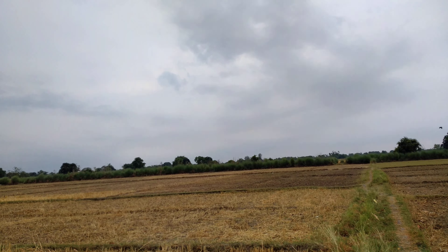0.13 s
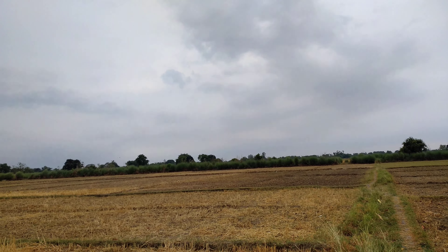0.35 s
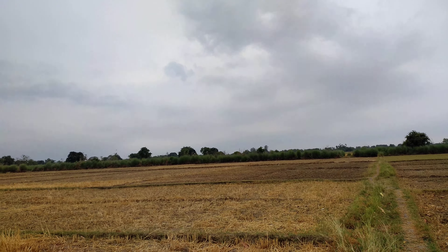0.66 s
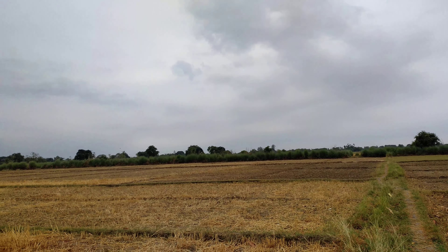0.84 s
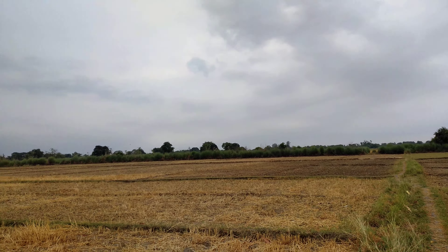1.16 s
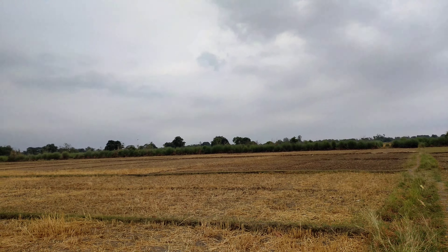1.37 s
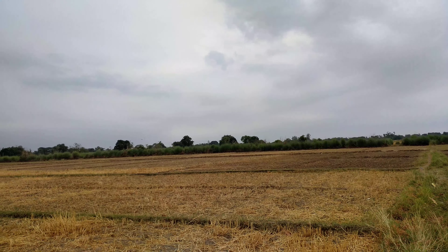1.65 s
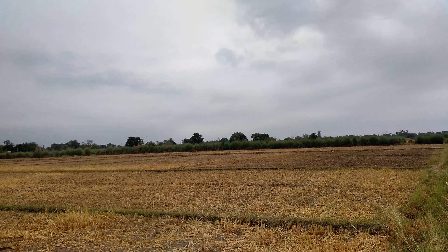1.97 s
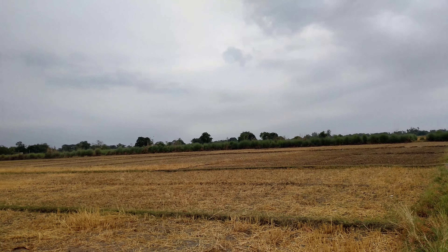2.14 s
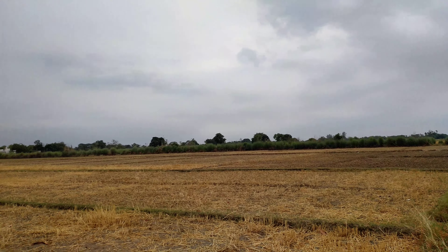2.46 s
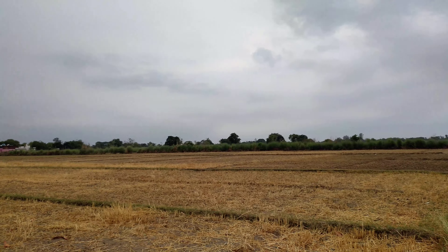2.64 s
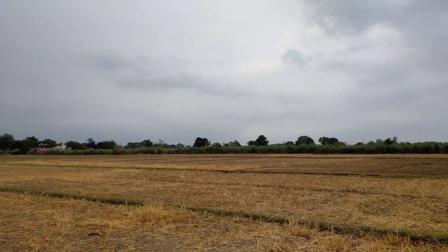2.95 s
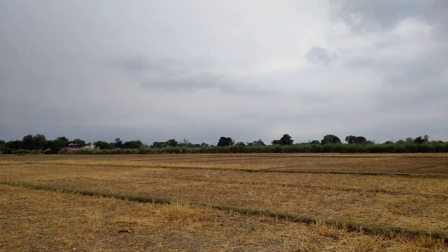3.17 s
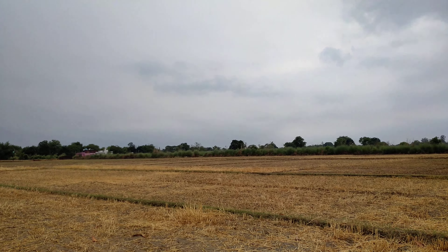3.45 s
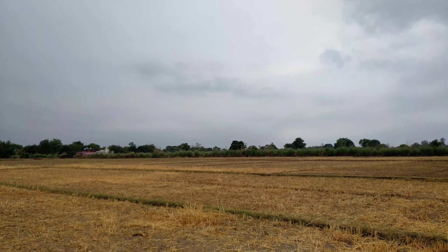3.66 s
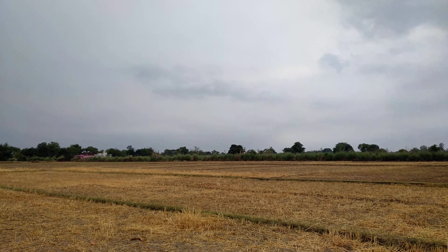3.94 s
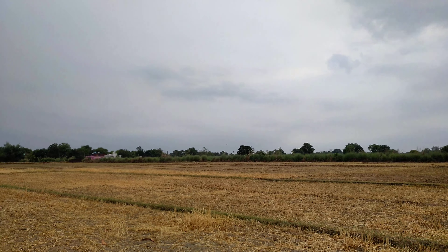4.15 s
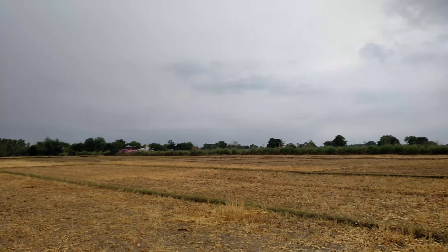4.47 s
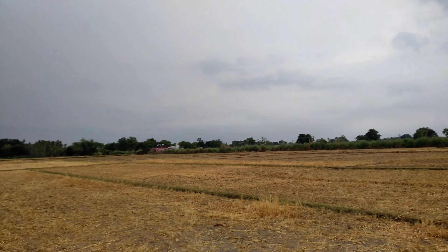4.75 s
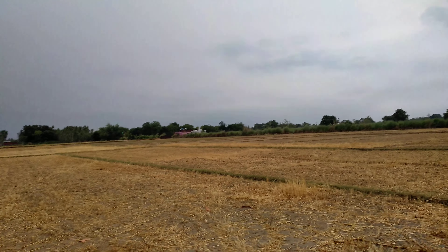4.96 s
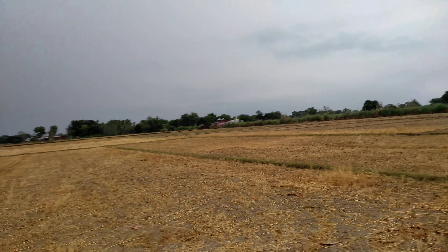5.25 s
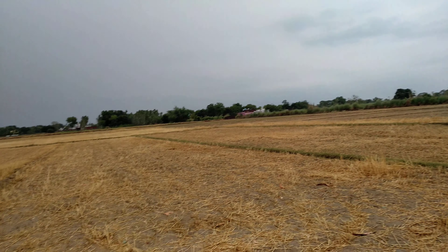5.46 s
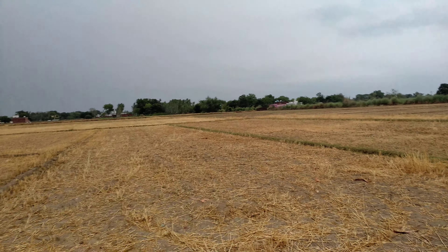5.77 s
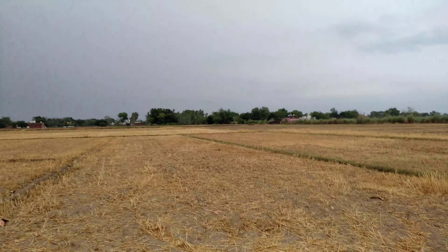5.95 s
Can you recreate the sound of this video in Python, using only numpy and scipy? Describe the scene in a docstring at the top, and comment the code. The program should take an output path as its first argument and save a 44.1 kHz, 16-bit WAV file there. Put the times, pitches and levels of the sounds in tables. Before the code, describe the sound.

Small birds chatter toward the left over low, thumping wind buffets, a soft dry-grass hiss and dull knocks at a slow, regular pace.

```python
"""A flock of small birds chirps and chatters, mostly to the left, over an open stubble field on a windy day.
Near birds squabble in nasal arched calls, and a far roost is many cheeps blurred into one steady band.
Choppy gusts of noise and round low eddies buffet the two ports of a hand-held microphone.
Shaped noise makes the far rumble and the hiss of dry grass; ringing modes make a slow, dull knock.
Straw ticks twice, soft thuds pass, and one far bird gives a hoarse call built from harmonics."""
import sys
import numpy as np
from scipy import signal
from scipy.fft import rfft, irfft, next_fast_len
from scipy.io import wavfile
from scipy.ndimage import uniform_filter1d, map_coordinates

SR = 44100
rng = np.random.default_rng(int(sys.argv[2]) if len(sys.argv) > 2 else 0)


def file_out(sig):
    """Save sig as 16-bit WAV at sys.argv[1]."""
    # one column per channel
    cols = np.atleast_2d(sig).T
    # limit, then scale
    lim = np.clip(cols, -1, 1)
    pcm = np.round(lim * 32767).astype(np.int16)
    wavfile.write(sys.argv[1], SR, pcm)


N = 269451  # length of the scene [samples]

# Far rumble: (frequency [Hz], relative density [dB per Hz])
RUMBLE_COLOUR = [(20, -19), (70, 10.5), (130, 0), (250, 2), (400, -9), (700, -22), (1200, -28), (2500, -69),
                 (8000, -65)]
# Soft low thuds, alike in both ears but for a small tilt: (middle [s], nominal length [s], level [dB])
THUDS = [(0.048, 0.14, -55), (3.624, 0.086, -45.5), (4.293, 0.073, -43.5), (4.841, .05, -46),
         (5.126, 0.074, -48)]
# Hiss of dry grass: (frequency [Hz], relative density [dB per Hz])
GRASS_COLOUR = [(200, 6.5), (700, -1), (1500, -0.5), (3000, -3), (6000, -1.5), (8000, -11.5),
                (11000, -17.5), (13500, -22.5), (15000, -44)]
# How the hiss leans to one side: (frequency [Hz], added left minus right [dB])
GRASS_SIDE = [(500, -1), (1200, 5), (3000, 1), (7000, -0.5)]
# Slow course of the hiss, before its small random sway: (time [s], level [dB])
BREEZE = [(0, -58.5), (.9, -57.5), (2.2, -60.5), (5, -60.5), (6.1, -59)]

# Rough air at the ports: (frequency [Hz], relative density [dB per Hz])
TURBULENCE_COLOUR = [(20, -52), (40, -14), (65, -1), (92, 2), (160, -6), (240, -12), (330, -29),
                     (500, -36.5), (900, -62), (2000, -68), (5000, -110)]
# Gusts: (peak [s], length [s], left port [dB], right port [dB])
GUSTS = [(0.829, 0.12, -44, -35.5), (1.032, 0.1, -46.5, -41), (1.33, 0.23, -48, -40),
         (1.7, 0.44, -36, -43.5), (1.974, 0.3, -32, -40.5), (2.46, 0.15, -37, -50),
         (2.715, 0.22, -33.5, -39.5), (2.955, 0.33, -38.5, -54), (3.692, 0.14, -37.5, -48),
         (3.888, 0.14, -35.5, -46), (4.999, 0.058, -52, -32.5), (5.132, 0.083, -53, -41.5),
         (5.346, 0.15, -34.5, -31), (5.48, 0.21, -37, -31.5), (5.813, 0.058, -31, -55),
         (6.098, 0.2, -37.5, -36)]
# A gust's drop half a length from its peak [dB], and the power law of that drop
GUST_EDGE_DB, GUST_SHAPE = 4.5, 2.3
# Flow between gusts: (left port [dB], right port [dB])
LULL_DB = [-54.5, -54]
# The hardest single eddies: (middle [s], level [dB], port [0 left, 1 right])
EDDIES = [(0.214, -34, 1), (0.235, -29, 1), (.236, -39, 0), (.351, -39, 1), (.406, -38.5, 1),
          (.587, -30, 1), (.954, -23.5, 1), (1.051, -35, 1), (1.141, -36, 1), (1.508, -35, 1),
          (1.645, -31.5, 0), (1.722, -29, 1), (1.748, -33, 0), (2.023, -25, 0), (2.382, -30.5, 1),
          (2.502, -31, 0), (2.889, -36.5, 1), (3.055, -32.5, 0), (3.194, -36.5, 1), (3.272, -39.5, 1),
          (3.396, -39, 0), (3.786, -33, 1), (3.898, -32.5, 1), (4.839, -41, 0), (5.405, -30, 1),
          (5.434, -28.5, 1), (5.491, -26.5, 1), (5.773, -39, 1), (5.833, -31.5, 0), (5.995, -27.5, 1),
          (6.034, -35.5, 1)]
EDDY_S, EDDY_HZ = 0.0091, 103.4  # half the passing time [s], middle of the random thump pitches [Hz]
# Eddies that strike a port squarely and flap: (middle [s], level [dB], port [0 left, 1 right])
FLAPS = [(1.505, -31, 0), (5.666, -35.5, 1)]
# Colour of a flap: (frequency [Hz], relative density [dB per Hz])
FLAP_COLOUR = [(100, 8.5), (220, 12), (370, 4), (550, -11.5), (900, -17), (1400, -35), (4000, -70)]
# Fine swirls in fast air: (frequency [Hz], relative density [dB per Hz])
SWIRL_COLOUR = [(120, -10.5), (210, 5), (300, -4.5), (430, -14.5), (800, -43), (2000, -78)]
# Swirl level in a brisk gust [dB], growth [dB per dB of gust], level of a brisk gust [dB]
SWIRL_DB, SWIRL_GROWS, BRISK_DB = -40.5, 1.43, -31.5
# The microphone sheds the deepest bass: (frequency [Hz], gain [dB])
MIC_BASS = [(15, -21), (30, -4), (50, -0.5)]
PORT_LEAK = 0.12  # share of each port's buffeting that reaches the other
# Moments when the bass drops out in the right ear: (middle [s], length [s])
BASS_GAPS = [(0.193, 0.035), (0.284, 0.079), (0.464, 0.058), (0.715, 0.097), (1.104, 0.045), (1.564, 0.045),
             (1.85, 0.078), (2.234, 0.18), (2.569, 0.067), (2.949, 0.061), (1.653, 0.031), (1.005, 0.018),
             (3.306, 0.032), (5.865, 0.097)]
GAP_DEPTH_DB = -29  # gain of the affected bass in mid-gap
# How much of the sound a gap affects: (frequency [Hz], share [0 to 1])
GAP_BAND = [(300, 0.95), (480, 0), (800, 0)]

# Dry straw ticks: (snap [s], snap level [dB], rustle level [dB])
TICKS = [(0.1407, -34, -48.5), (3.643, -57, -50.5)]
# Dull knocks, strength before the trims in knocks(): (time [s], strength [dB])
KNOCKS = [(1.103, -40), (1.914, -39.5), (2.735, -38), (3.541, -38), (4.360, -36.5), (5.169, -39),
          (5.967, -42.5)]
# What the knock rings with: (pitch [Hz], relative level before a random change [dB], time to fade 60 dB [s])
KNOCK_MODES = [(570, 9.5, 0.029), (629, 10, 0.036), (742, 2, 0.048), (880, -28, 0.028), (1096, -9, 0.052)]
# The contact of a knock: (frequency [Hz], relative density [dB per Hz])
SCUFF_COLOUR = [(300, -13), (680, 9.5), (950, -12), (1300, -13), (2500, -29), (6000, -67)]

# Scatter from the hedges: (frequency [Hz], time to fade 60 dB [s])
HEDGE_FADE = [(500, 0.21), (3000, 1), (10000, 0.019)]
# Growing delay of the birds in the left port: (time [s], left behind right [samples])
PORT_LAG = [(0, 6.07), (3, 11.06), (6.1, 19.6)]
# How far left a bird sits for its pitch: (pitch [Hz], left minus right [dB])
BIRD_SIDE = [(2300, 13.5), (3300, 15), (4200, 12.5), (6000, 2.5)]

# Far roost: (time [s], level [dB])
ROOST_LEVEL = [(2.25, -73), (2.55, -59.5), (2.95, -59.5), (3.3, -59), (3.7, -68)]
# Colour of the roost's blur: (frequency [Hz], relative density [dB per Hz])
ROOST_COLOUR = [(3000, -43), (3600, -10), (3850, -0.5), (4100, -11), (4400, -19), (5200, -33)]
# The flock before the balance in flock(): (time [s], low voices [dB], high voices [dB])
FLOCK_LEVEL = [(0, -48.5, -46), (.53, -49.5, -52.5), (1.29, -46.5, -51), (1.84, -55, -52.5),
               (3.57, -47, -53.5), (3.81, -57.5, -51.5), (4.39, -57, -44.5), (4.54, -55.5, -56),
               (4.66, -53, -42), (5.9, -58.5, -61), (6.11, -52.5, -52)]
# Low voices of the flock: (frequency [Hz], relative density [dB per Hz])
LOW_COLOUR = [(1200, -29), (1800, -12.5), (2150, -6.5), (2550, -3.5), (3000, -6.5), (3500, -24),
              (4500, -53)]
# High voices of the flock: (frequency [Hz], relative density [dB per Hz])
HIGH_COLOUR = [(2400, -26), (3200, 0.5), (3900, 2.5), (4500, 1), (5200, -10), (6400, -27), (7500, -20),
               (10000, -72), (14000, -59)]
# A shrill squabble in the flock: (time [s], level [dB])
SQUABBLE_LEVEL = [(.6, -93), (.92, -60), (1.06, -49), (1.2, -56), (1.34, -52), (1.55, -55.5), (1.8, -97),
                  (2.2, -86)]
# Its colour: (frequency [Hz], relative density [dB per Hz])
SHRILL_COLOUR = [(2000, -18), (3000, -12), (4400, 11), (6000, -3), (7000, -5.5), (8200, -10), (10500, -42),
                 (13000, -52)]
ARCH_BEND = 0.218  # bend of the calls at middle distance
CALL_SWELL = 0.65  # power that shapes a call's rise and fall; smaller is flatter

# Nasal calls of the nearest birds, level before the rasp:
# (start [s], length [s], top of the fundamental [Hz], crest [0 early, 1 late], bend [log pitch], level [dB])
NASAL_CALLS = [(.876, .052, 2080, .52, .22, -49), (.95, .057, 1985, .4, .2, -44.5),
               (1.047, .056, 2140, .35, .36, -45), (1.117, .052, 2090, .3, .25, -45),
               (1.242, .06, 2140, .46, .48, -42.5), (1.3, .074, 2180, .33, .4, -41.5),
               (1.33, .04, 1960, .3, .14, -42), (1.431, .056, 2014, .4, .33, -48),
               (1.505, .06, 2105, .55, .35, -46.5), (1.564, .034, 2260, 0, .2, -52),
               (1.6, .062, 2306, .48, .38, -52), (1.648, .06, 2140, .22, .19, -46),
               (1.775, .04, 1920, .4, .1, -53), (1.95, .045, 2020, .35, .15, -51)]
# Their harmonics from the fundamental up: (relative level [dB])
NASAL_HARMONICS_DB = [-13, 8.5, -18, -24, -30, -42]
NASAL_RASP_DB = -20.5  # a hoarse edge that spreads around every harmonic
# Whistled chirps, each one arch of pitch:
# (start [s], length [s], top pitch [Hz], crest [0 early, 1 late], bend [log pitch], level [dB])
CHIRPS = [(0.592, 0.045, 2664, 0.51, 0.14, -53.5), (0.777, 0.052, 2482, -0.011, 0.14, -52.5),
          (.965, 0.1, 3070, 0.78, .16, -52), (.971, 0.12, 2540, 0.2, .17, -53.5),
          (1.028, .045, 4870, .2, .14, -55.5), (1.159, .052, 4650, -.07, .12, -51),
          (1.272, .082, 2537, .1, .22, -52), (1.36, .06, 2480, .35, .3, -53),
          (1.545, .05, 2350, .26, .25, -53), (1.603, .035, 3720, .4, .12, -53),
          (1.949, .07, 2677, .24, .15, -53), (2.14, .04, 3930, .056, .063, -52.5),
          (2.278, .035, 4480, 0, .12, -55.5), (2.498, .04, 4010, 0, .099, -55),
          (2.592, .028, 4130, .4, .15, -55), (2.7, .038, 3810, .59, .092, -53),
          (2.73, .04, 3140, .089, .08, -54.5), (3.08, .03, 4380, 0, .07, -53),
          (3.196, .025, 4500, 0, .08, -55), (3.465, .08, 4300, -.7, .05, -49),
          (3.578, .045, 2430, .4, .12, -53), (3.638, .07, 3050, .6, .08, -49),
          (4.084, .053, 3410, .35, .17, -50), (4.126, .07, 2630, .1, .1, -54),
          (4.18, .038, 4600, 1, .23, -52), (4.205, .06, 4280, .55, .2, -47.5),
          (4.324, .055, 2375, .45, .28, -53), (4.386, .028, 3590, .47, .22, -47),
          (4.64, .05, 3020, .6, .1, -53), (4.687, .085, 2740, .2, .14, -50.5),
          (4.868, .052, 2800, -.25, .21, -49.5), (4.889, .036, 4550, -.15, .14, -45),
          (4.915, .038, 2450, -.2, .15, -53), (5.024, .04, 4200, 0, .1, -50.5),
          (5.335, .038, 4300, 1, .2, -54), (5.414, .062, 2460, .3, .15, -58),
          (5.69, 0.09, 3520, 0.13, .05, -57)]
# Thin buzzy calls on the same arch, level before the lift in near_birds():
# (start [s], length [s], top pitch [Hz], crest [0 early, 1 late], bend [log pitch], level [dB])
BUZZES = [(0.696, 0.13, 5550, -0.049, 0.16, -59.5), (2.185, .048, 5100, 0.22, 0.15, -59),
          (2.409, .051, 5770, 0.11, 0.077, -57.5), (3.063, 0.14, 6330, 0.015, .1, -58.5),
          (3.355, .1, 5070, .15, 0.14, -55.5), (3.743, 0.087, 4900, .14, 0.12, -58),
          (4.002, 0.074, 6850, -0.62, .16, -59), (4.285, 0.2, 4660, .46, .051, -59),
          (4.689, 0.093, 5510, 0.17, 0.24, -60)]

TOP_HZ = 14500  # the recorder's band limit


def amp(db):
    """Decibels to gain."""
    return 10 ** (np.asarray(db) / 20)


def unit(x):
    """Scale to an average strength (rms) of 1."""
    return x / np.sqrt(np.mean(x ** 2) + 1e-20)


def along(points, hz):
    """Read a value off (Hz, value) points, on a log pitch axis."""
    f, v = np.transpose(points)
    return np.interp(np.log(hz + 1), np.log(f + 1), v)


def curves(rows):
    """One value per sample for each column after the time."""
    s, *columns = np.transpose(rows)
    t = np.arange(N) / SR
    return np.array([np.interp(t, s, column) for column in columns])


def wobble(rate, size=N):
    """A smooth random curve with rate random points a second."""
    knots = rng.standard_normal(int(size * rate / SR) + 4)
    return map_coordinates(knots, [np.arange(size) * rate / SR])


def filtered(x, response):
    """Change the strength of each frequency in x by response(hz)."""
    size = next_fast_len(x.shape[-1] + 8192)
    spectrum = rfft(x, size) * response(np.fft.rfftfreq(size, 1 / SR))
    return irfft(spectrum, size)[..., :x.shape[-1]]


def noise(spectrum, shape=(2, N)):
    """Coloured noise of rms 1."""
    return unit(filtered(rng.standard_normal(shape), lambda hz: amp(along(spectrum, hz))))


def add(out, s, x):
    """Mix x into out from time s on, cutting what lies outside."""
    start = round(s * SR)
    x = x[..., max(-start, 0):max(N - start, 0)]
    first = max(start, 0)
    out[..., first:first + x.shape[-1]] += x


def panned(x, left_db):
    """Set left above right by left_db, keeping the power."""
    return unit(amp([[left_db / 2], [-left_db / 2]])) * x


def puff(spectrum, length):
    """A bell-shaped burst of noise lasting twice its nominal length, rms 1 over that length."""
    size = int(2 * length * SR)
    return unit(noise(spectrum, size) * np.hanning(size)) / np.sqrt(2)


def rustle(spectrum, patchy_db):
    """Stereo noise of rms 1, with brief patches of random gain in time and pitch."""
    z = signal.stft(rng.standard_normal((2, N)), nperseg=512)[2]
    patches = uniform_filter1d(rng.standard_normal(z.shape[1:]), size=4, axis=0)
    patches = uniform_filter1d(patches, size=9, axis=1)
    pair = signal.istft(z * amp(patchy_db * unit(patches)), nperseg=512)[1][:, :N]
    return unit(filtered(pair, lambda hz: amp(along(spectrum, hz))))


def hedges(x):
    """Diffuse scatter, unrelated between the ears, whose treble dies faster."""
    hz, t, z = signal.stft(rng.standard_normal((2, SR // 2)), SR, nperseg=256)
    fade = amp(-60 * t / along(HEDGE_FADE, hz)[:, None])
    tail = signal.istft(z * fade, SR, nperseg=256)[1]
    return signal.fftconvolve(x, tail / np.linalg.norm(tail[0]), axes=1)[:, :N]


def spaced(x):
    """The two ports hear the birds a fraction of a millisecond apart."""
    late_left = map_coordinates(x[0], [np.arange(N) - curves(PORT_LAG)[0]])
    return np.array([late_left, x[1]])


def rumble(shared_db=-55, apart_db=-65):
    """Far rumble, nearly mono and slowly swaying, with a few soft bursts of low noise as thuds."""
    low = amp(shared_db) * noise(RUMBLE_COLOUR, N) + amp(apart_db) * noise(RUMBLE_COLOUR)
    low *= amp(0.82 * wobble(3.254))
    thud_colour = [(30, -7), (70, -11), (150, 3), (270, 4), (400, -19), (1500, -70)]  # (Hz, dB per Hz)
    for s, length, db in THUDS:
        add(low, s - length, amp(db) * puff(thud_colour, length))
    return panned(low, left_db=2)


def grass():
    """Dry grass hisses all around: patchy noise whose level sways."""
    hiss = amp(curves(BREEZE) + 1.6 * wobble(6.2)) * rustle(GRASS_COLOUR, patchy_db=4)
    ears = np.array([[0.5], [-0.5]])
    return filtered(hiss, lambda hz: amp(along(GRASS_SIDE, hz) * ears))


def gusts():
    """Strength of the flow at each port: bell-shaped gusts add their power to the lull."""
    t = np.arange(N) / SR
    power = amp(LULL_DB)[:, None] ** 2 * np.ones(N)
    for s, length, left_db, right_db in GUSTS:
        drop = GUST_EDGE_DB * np.abs(2 * (t - s) / length) ** GUST_SHAPE
        power = power + amp(np.array([left_db - drop, right_db - drop])) ** 2
    return np.sqrt(power)


def wind(lump_db=3.0, sway_db=0.5):
    """Each port has its own lumpy turbulence, with single round eddies and a few flaps on top."""
    lumps = [lump_db * wobble(45) + sway_db * wobble(16) for port in range(2)]
    flow = noise(TURBULENCE_COLOUR) * amp(lumps)
    # Even out the slow level, so that the gusts alone set it.
    flow /= np.sqrt(np.abs(uniform_filter1d(flow ** 2, size=SR // 12)) + 1e-6)
    out = flow * gusts()
    t = np.arange(-SR // 20, SR // 20) / SR
    draws = rng.uniform(-0.92, 1, (len(EDDIES), 2))
    for (s, db, port), (pitch, turn) in zip(EDDIES, draws):
        hz = EDDY_HZ * np.exp(0.22 * pitch)
        thump = 2 * np.exp(-(t / EDDY_S) ** 2) * np.sin(2 * np.pi * hz * t + np.pi * turn)
        add(out[int(port)], s + t[0], amp(db) * thump)
    for s, db, port in FLAPS:
        flap = amp(db) * puff(FLAP_COLOUR, 0.029)
        add(out[int(port)], s - len(flap) / SR / 2, flap)
    return out


def swirls():
    """Faster air sheds finer swirls, so strong gusts sound fuller."""
    speed = gusts() / amp(BRISK_DB)
    return amp(SWIRL_DB) * speed ** SWIRL_GROWS * noise(SWIRL_COLOUR) * amp(4.2 * wobble(30))


def bass_gaps(x):
    """The bass in the right ear cuts out for moments, which makes the buffeting choppy."""
    t = np.arange(N) / SR
    shut = np.max([np.exp(-(2 * (t - s) / length) ** 4) for s, length in BASS_GAPS], axis=0)
    bass = filtered(x[1], lambda hz: np.clip(along(GAP_BAND, hz), 0, 1))
    return np.array([x[0], x[1] - bass * (1 - amp(GAP_DEPTH_DB * shut))])


def straw(snap_hz=1650, t60=0.013, rustle_length=0.015):
    """A stalk snaps, as a fast-fading tone, inside a brief bright rustle of noise."""
    out, t = np.zeros((2, N)), np.arange(SR // 20) / SR
    bright = [(500, -36), (1500, 12), (3000, 3.5), (6000, -6), (9000, 1.5), (14000, -21)]  # (Hz, dB per Hz)
    for s, snap_db, rustle_db in TICKS:
        add(out, s, amp(snap_db - 60 * t / t60) * np.sin(2 * np.pi * snap_hz * t))
        pair = np.array([puff(bright, rustle_length) for ear in out])
        add(out, s - rustle_length, amp(rustle_db) * pair)
    return out


def knocks(ring_db=-9, attack=0.0059, contact_db=-13):
    """A soft hollow knock, about every 0.8 s: a brief scuff of contact sets the modes ringing."""
    out, t = np.zeros((2, N)), np.arange(SR // 5) / SR
    for s, strength_db in KNOCKS:
        ring = np.zeros(len(t))
        for hz, level, t60 in KNOCK_MODES:
            fade = amp(level + rng.normal(0, 0.98) - 60 * t / t60)
            ring += fade * np.sin(2 * np.pi * (hz * t + rng.random()))
        ring *= 1 - np.exp(-t / attack)  # soft start
        add(out, s, panned(amp(strength_db + ring_db) * ring, left_db=-2.5))
        scuff = amp(strength_db + contact_db) * puff(SCUFF_COLOUR, 0.018)
        add(out, s - 0.008, panned(scuff, left_db=10))
    return out + amp(-11) * hedges(out)


def hoarse_call(s=2.655, length=0.171, pitch_hz=500, db=-60):
    """A far, rough caw: a gently arched stack of harmonics through one throat resonance."""
    size = int(length * SR)
    u = np.linspace(0, 1, size)
    hz = pitch_hz * (1 - 0.22 * (u - 0.5) ** 2 + 0.095 * wobble(520, size))
    phase = 2 * np.pi * np.cumsum(hz) / SR
    throat = [(700, -28), (1050, -18), (1450, -4), (1800, -25), (2600, -49)]  # (Hz, dB)
    harmonics = sum(np.sin(k * phase) for k in range(1, 6))
    voice = filtered(harmonics, lambda f: amp(along(throat, f)))
    swell = np.sqrt(u) * np.abs(np.sin(np.pi * u)) ** 0.9
    out = np.zeros((2, N))
    add(out, s, panned(amp(db) * unit(voice * swell), left_db=9))
    return out + amp(-14) * hedges(out)


def arch(top_hz, crest, bend):
    """Start, middle and end pitch: log pitch falls by bend times the squared distance from the crest."""
    place = np.array([0, 0.5, 1])  # in lengths of the call
    return top_hz * np.exp(-bend * (place - crest) ** 2)


def chirp(length, start_hz, middle_hz, end_hz, rough=0.01, flutter_db=2, harmonics_db=(0, -30)):
    """One curved call of rms 1 that swells and fades, with a slight random quaver and its harmonics."""
    size = int(max(length, 0.01) * SR)
    u = np.linspace(0, 1, size)
    hz = np.polyval(np.polyfit([0, 0.5, 1], [start_hz, middle_hz, end_hz], 2), u)
    phase = 2 * np.pi * np.cumsum(hz * (1 + rough * wobble(509, size))) / SR
    swell = np.abs(np.sin(np.pi * u)) ** CALL_SWELL * amp(flutter_db * wobble(120.3, size))
    voice = sum(amp(db) * np.sin(k * phase) for k, db in enumerate(harmonics_db, 1))
    return unit(swell * voice)


def roost(count=110):
    """Many far, nearly level cheeps close to one pitch, blurred with noise into a steady band."""
    calls = np.zeros(N)
    for place, pitch in rng.random((count, 2)):
        cheep = chirp(0.09, *arch(3800 + 300 * pitch, 0.4, 0.05), rough=0.015, flutter_db=4)
        add(calls, place * N / SR, cheep)
    band = unit(unit(calls) + rustle(ROOST_COLOUR, patchy_db=8)[0])
    return amp(curves(ROOST_LEVEL)) * spaced(panned(band, left_db=3.5))


def scattered_starts(count):
    """Start times [s], one at random in each equal share of the scene."""
    return (np.arange(count) + rng.random(count)) * N / SR / count


def chatter(spectrum, centre_hz, spread, left_db, blur_db, count):
    """Many far chirps, mostly falling, melt into a wash of raspy noise, kept at an even level near rms 1."""
    calls = np.zeros(N)
    draws = rng.uniform(-1, 1, (count, 5))
    for s, (pitch, life, size, rise, fall) in zip(scattered_starts(count), draws):
        hz = centre_hz * np.exp(spread * pitch)
        start_hz, end_hz = hz * (0.99 + 0.051 * rise), hz * (0.92 + 0.066 * fall)
        length = 0.055 * np.exp(0.5 * life)
        call = chirp(length, start_hz, hz, end_hz, rough=0.014, flutter_db=3.5)
        add(calls, s, amp(5 * size) * call)
    calls = unit(filtered(calls, lambda f: amp(along(spectrum, f))))
    blur = amp(blur_db) * rustle(spectrum, patchy_db=3.5)[0]
    direct = spaced(panned(calls + blur, left_db))
    both = direct + amp(-3) * panned(rustle(spectrum, patchy_db=8), left_db / 2)
    power = uniform_filter1d(np.mean(both ** 2, axis=0), size=SR // 6)
    return both / np.sqrt(np.abs(power) + 1e-6)


def singers(centre_hz, count):
    """Birds at middle distance: the same arched chirp, scattered in time, pitch, length and strength."""
    out = np.zeros((2, N))
    draws = rng.uniform(-1, 1, (count, 4))
    for s, (pitch, life, size, crest) in zip(scattered_starts(count), draws):
        top_hz = centre_hz * np.exp(0.12 * pitch)
        pitches = arch(top_hz, 0.4 + 0.2 * crest, ARCH_BEND)
        whistle = chirp(0.05 * np.exp(0.3 * life), *pitches, rough=0.009, flutter_db=3)
        add(out, s, panned(amp(2 * size) * whistle, along(BIRD_SIDE, top_hz)))
    return spaced(out)


def flock(low_db=-1.75, high_db=-1.5, crowd_db=-57, singer_db=-11):
    """Low and high voices swell separately, with a shrill squabble among them."""
    levels = curves(FLOCK_LEVEL)
    # Above crowd_db the flock grows by only half, as the near birds carry most of the loud moments.
    low, high = levels - 0.5 * np.maximum(levels - crowd_db, 0)
    lows = chatter(LOW_COLOUR, centre_hz=2530, spread=0.22, left_db=11, blur_db=2.5, count=170)
    highs = chatter(HIGH_COLOUR, centre_hz=4334, spread=0.33, left_db=6.5, blur_db=-3.5, count=380)
    lows = lows + amp(singer_db) * singers(centre_hz=2460, count=36)
    highs = highs + amp(singer_db) * singers(centre_hz=4010, count=36)
    shrill = chatter(SHRILL_COLOUR, centre_hz=6470, spread=0.45, left_db=-1, blur_db=-6, count=400)
    squabble = amp(curves(SQUABBLE_LEVEL)) * shrill
    return amp(low + low_db) * lows + amp(high + high_db) * highs + squabble


def near_birds(buzz_db=1, scatter_db=-13):
    """Nasal calls, chirps, buzzes and one long sinking whistle stand out, nearly dry in the open air."""
    out = np.zeros((2, N))
    for s, length, top_hz, crest, bend, db in NASAL_CALLS:
        pitches = arch(top_hz, crest, bend)
        call = chirp(length, *pitches, rough=0.008, flutter_db=3, harmonics_db=NASAL_HARMONICS_DB)
        rasp = 1 + amp(NASAL_RASP_DB) * wobble(2600, len(call))
        add(out, s, panned(amp(db) * call * rasp, left_db=7.5))
    for s, length, top_hz, crest, bend, db in CHIRPS:
        whistle = chirp(length, *arch(top_hz, crest, bend), rough=0.011, flutter_db=3.5)
        add(out, s, panned(amp(db) * whistle, along(BIRD_SIDE, top_hz)))
    for s, length, top_hz, crest, bend, db in BUZZES:
        buzz = chirp(length, *arch(top_hz, crest, bend), rough=0.018, flutter_db=4)
        add(out, s, panned(amp(db + buzz_db) * buzz, along(BIRD_SIDE, top_hz)))
    sinking = chirp(0.19, 4400, 4260, 4150, rough=0.005, flutter_db=1.5)
    add(out, 1.98, panned(amp(-54) * sinking, left_db=-2))
    return spaced(out) + amp(scatter_db) * hedges(out)


def scene():
    """Everything in the field, as it reaches the two ports."""
    buffet = filtered(wind() + swirls(), lambda hz: amp(along(MIC_BASS, hz)))
    leak = PORT_LEAK * buffet[::-1]  # each port's buffeting in the other
    air = bass_gaps(buffet + leak + rumble() + grass())
    return air + straw() + knocks() + hoarse_call() + roost() + flock() + near_birds()


def record(dry):
    """The sound fades in and out over 3 ms, and the recorder keeps nothing above its band limit."""
    edge = np.minimum(np.arange(N), np.arange(N)[::-1]) / (0.003 * SR)
    return filtered(dry * np.minimum(edge, 1), lambda hz: hz < TOP_HZ)


dry = scene()
out = record(dry)
file_out(out)
```